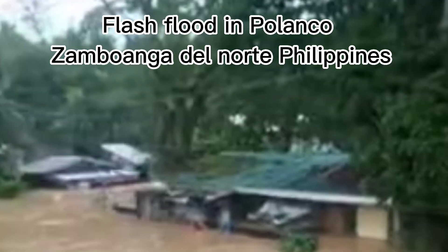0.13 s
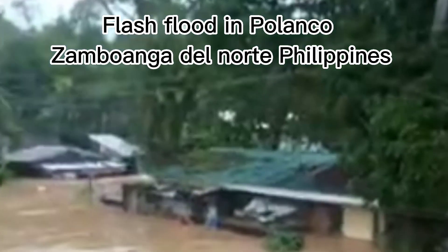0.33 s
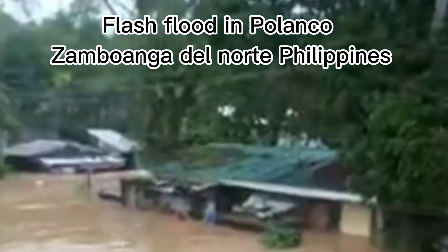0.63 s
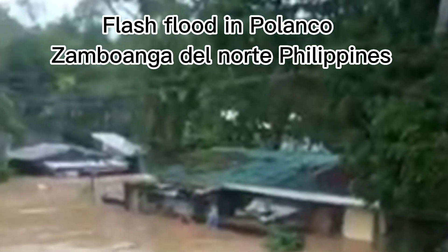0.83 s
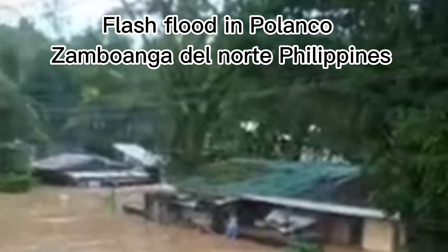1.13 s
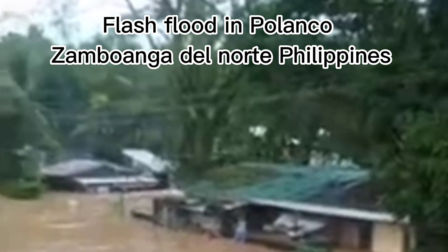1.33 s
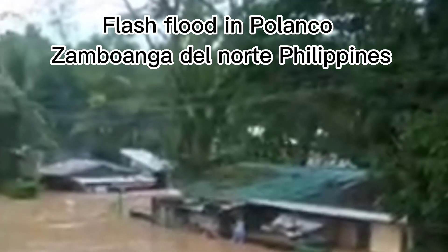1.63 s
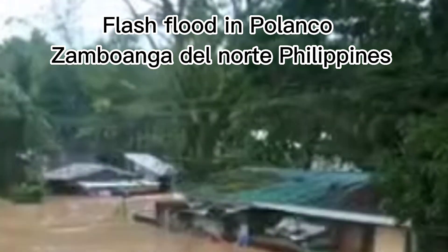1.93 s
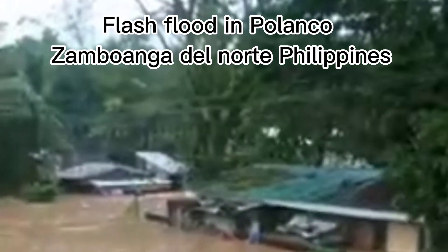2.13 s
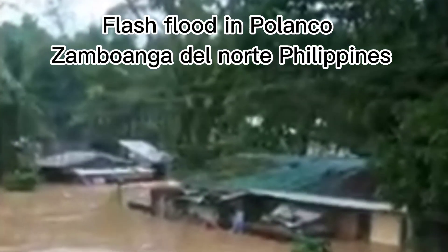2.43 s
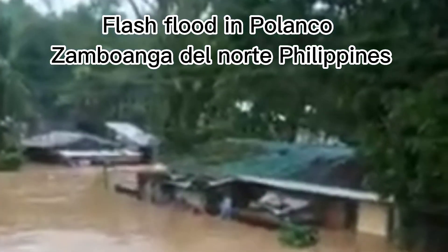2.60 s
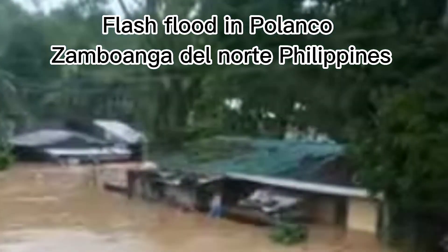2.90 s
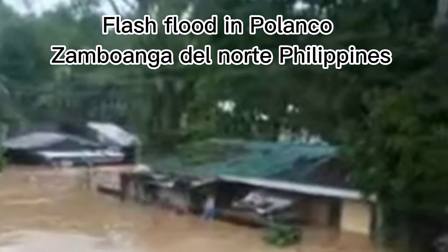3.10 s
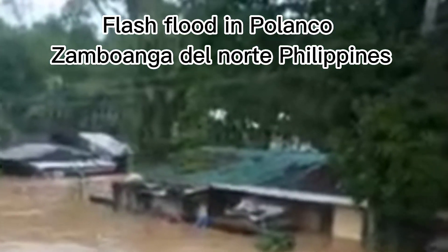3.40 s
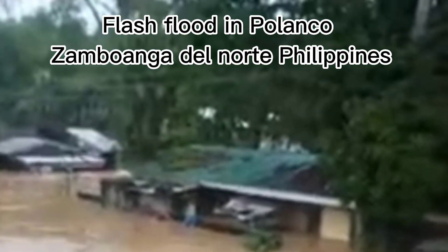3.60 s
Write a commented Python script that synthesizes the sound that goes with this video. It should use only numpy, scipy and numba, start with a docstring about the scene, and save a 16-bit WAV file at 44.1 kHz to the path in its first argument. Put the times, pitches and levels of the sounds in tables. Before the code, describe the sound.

Floodwater rushes and churns steadily close by, bubbling and splashing over a faint low motor hum.

```python
"""Flood water churns past houses, close to a phone under cover: distant wash, a froth of gliding sine
bubbles and ticks of noise for spray. Single plops, gurgles, climbing air pockets and droplet pings
stand out with a short echo. A small electric motor, a stack of sine partials, beats slowly against
the mains hum over a low outdoor rumble. The phone colours the rush strongly and adds faint hiss."""
import sys
import numpy as np
from scipy import signal
from scipy.fft import rfft, irfft
from scipy.io import wavfile
from scipy.ndimage import uniform_filter1d
from numba import njit

SR = 44100
rng = np.random.default_rng(int(sys.argv[2]) if len(sys.argv) > 2 else 0)


def wrap_up_sound(samples):
    """Save the sound to the file named by the first command line argument, as 16-bit audio."""
    columns = np.atleast_2d(samples).T
    # keep every value between -1 and 1, then stretch to whole-number steps
    tamed = np.clip(columns, -1, 1)
    steps = np.round(tamed * 32767).astype(np.int16)
    wavfile.write(sys.argv[1], SR, steps)


N = 165375

# Shared by small and large bubbles: share by which the pitch has risen once the decay length is reached
GLIDE = 0.086

# The surging flow. Each row: time in seconds, level below 4 kHz in dB, level above 4 kHz in dB.
FLOW_LEVELS = [(0, -20, -28.5), (.25, -24, -35.5), (.5, -23, -34), (.75, -22.5, -31.5), (.97, -21, -29.5),
               (1.13, -24.5, -32.5), (1.35, -22, -32.5), (1.58, -22, -29), (1.8, -23.5, -30),
               (2.1, -22.5, -32), (2.4, -23, -30.5), (2.7, -21.5, -31), (3, -22, -33), (3.2, -22, -31.5),
               (3.45, -23, -31), (3.75, -21.5, -30)]
SPLIT_HZ = 4000
BED_DB, FROTH_DB, SPRAY_DB = -2.5, -5.5, -11.5  # balance inside the rush, before colour and flow
SURGE_DB, SURGE_RATE_HZ = .7, 9.62


def rush():
    """Wash, froth and spray share one colour; low and high bands follow the flow, then surge together."""
    mix = level(wash(), BED_DB) + level(froth(), FROTH_DB) + level(spray(), SPRAY_DB)
    mix = water_colour(mix)
    low = signal.sosfiltfilt(signal.butter(4, SPLIT_HZ, fs=SR, output="sos"), mix)
    high = mix - low
    flow_s, low_db, high_db = np.array(FLOW_LEVELS).T
    now = np.arange(N) / SR
    low = level(low, 0) * undb(np.interp(now, flow_s, low_db))
    high = level(high, 0) * undb(np.interp(now, flow_s, high_db))
    return (low + high) * undb(SURGE_DB * walk(SURGE_RATE_HZ))


def wash():
    """Distant water blurs into noise whose level flickers."""
    flicker_db, flicker_rate_hz = 1.5, 40.15
    return rng.standard_normal(N) * undb(flicker_db * walk(flicker_rate_hz))


FROTH_PER_S, FROTH_SPREAD_DB = 1600, 3
FROTH_CYCLES, FROTH_ATTACK_CYCLES = 7.67, 4.8  # mean decay length, swell length


def froth():
    """Countless small bubbles ring at random moments, with pitches spread evenly in octaves."""
    place, pitch, size, length = rng.random((int(FROTH_PER_S * N / SR), 4)).T
    hz = 500 * 22 ** pitch  # 500 Hz to 11 kHz
    gain = hz * sizes(size, FROTH_SPREAD_DB)  # higher bubbles are louder
    cycles = FROTH_CYCLES * (.5 + length)
    return bubbles(N, place * N / SR, hz, cycles, gain, GLIDE + 0 * hz, FROTH_ATTACK_CYCLES)


SPRAY_PER_S, SPRAY_SPREAD_DB, SPRAY_HZ = 400, 4, 2960


def spray():
    """Landing spray makes tiny puffs of noise, thinned below a gentle high-pass."""
    place, size = rng.random((int(SPRAY_PER_S * N / SR), 2)).T
    puffs = splash(place * N / SR, sizes(size, SPRAY_SPREAD_DB))
    return signal.sosfilt(signal.butter(1, SPRAY_HZ, "high", fs=SR, output="sos"), puffs)


def drops():
    """Near water: single bubbles and droplets that stand out of the rush."""
    return plops() + gurgles() + pockets() + pings()


# Large bubbles. Each row: start in seconds, gain before the envelope in dB, starting pitch in Hz,
# decay length in cycles.
LARGE_BUBBLES = [(0.109, -0.5, 1380, 5.8), (0.3163, -4, 1730, 5.5), (0.3405, -15, 1640, 8),
                 (0.3648, -21, 1110, 6.1), (0.4264, -4, 1490, 6.7), (0.483, -16, 1700, 6.5),
                 (0.5042, -13, 1250, 7.4), (0.5945, -7.5, 1200, 6.4), (0.6374, -10, 1540, 7.2),
                 (0.6878, -13, 1540, 9.5), (0.7325, -14, 1620, 4.2), (0.7677, -12, 1140, 9.3),
                 (0.822, -8, 1150, 5.4), (0.8827, -12, 1270, 8), (0.9402, -14, 1140, 13),
                 (1.009, -18, 1140, 9.9), (1.035, 0.5, 1180, 4.3), (1.0587, 2.5, 1846, 8.2),
                 (1.1767, -10, 1640, 8.8), (1.2014, -3.5, 1680, 8), (1.2511, -5.5, 1720, 8.4),
                 (1.355, -19, 1255, 9.1), (1.485, -3, 1210, 9), (1.506, -10, 1630, 9.5),
                 (1.558, -12, 1690, 9), (1.6036, -8, 1160, 9.5), (1.6654, -15, 1840, 9.4),
                 (1.6995, -16, 1660, 8), (1.843, -6.5, 1620, 7.6), (1.8986, -6, 1370, 8),
                 (1.924, -3, 1114, 5.4), (1.9884, -8, 1570, 11), (2.0338, -15, 1630, 6.9),
                 (2.0464, -3, 1100, 5.9), (2.075, -3, 1670, 6.4), (2.1809, -18, 1340, 10),
                 (2.266, -12, 1620, 6.1), (2.3125, -15, 1070, 17), (2.3485, -6, 1080, 5.5),
                 (2.3979, -10.5, 1760, 17), (2.489, -13.5, 1104, 21), (2.6284, -9, 1170, 6.7),
                 (2.6754, -5, 1630, 8), (2.7275, -8.5, 1140, 6), (2.8789, -12, 1270, 6.6),
                 (2.9323, -10, 1660, 9.9), (2.989, -10.5, 1345, 12), (3.0596, -5, 1630, 5.4),
                 (3.1738, -5.5, 1660, 8.5), (3.26, -13, 1700, 8.7), (3.2802, -4.5, 1150, 6.7),
                 (3.406, -9, 1310, 5.8), (3.5242, -9, 1680, 8), (3.551, -3, 1460, 7),
                 (3.621, -11, 1300, 12), (3.69, -25, 1150, 6.6)]


def plops():
    """Large bubbles ring at a middle pitch and glide up slightly."""
    return ring(LARGE_BUBBLES, GLIDE)


# Deep gurgles. Each row: start in seconds, gain before the envelope in dB, starting pitch in Hz,
# decay length in cycles, rise of pitch by the decay length as a share.
DEEP_GURGLES = [(0.427, -17, 907, 16, 0.048), (0.603, -20.5, 590, 9, 0.083), (0.69, -21, 850, 11, 0.1),
                (0.801, -11.5, 724, 9.7, 0.091), (0.94, -14, 977, 15, 0.094), (1.037, -8, 780, 4.3, 0.068),
                (1.059, -7, 970, 8.5, 0.12), (1.355, -16, 824, 10, 0.1), (1.394, -27, 800, 12, 0.071),
                (1.52, -26, 760, 4.4, 0.12), (2.05, -15.5, 796, 8.8, 0.083), (2.485, -13.5, 890, 13, 0.082),
                (2.631, -10.5, 990, 7.7, 0.1), (2.688, -20, 810, 15, 0.1), (3.089, -11, 920, 6.6, 0.06),
                (3.121, -25, 666, 10, 0.094), (3.178, -14.5, 743, 12.4, 0.1), (3.23, -12, 840, 4.9, 0.051),
                (3.362, -20, 850, 16, 0.062), (3.513, -12, 784, 5.9, 0.1), (3.583, -28.5, 590, 15, 0.083),
                (3.682, -28, 980, 10, 0.12)]


def gurgles():
    """Deep bubbles climb in pitch as they ring, each by its own share."""
    return ring(DEEP_GURGLES, np.array(DEEP_GURGLES)[:, 4])


# Air pockets that fill with water. Each row: start in seconds, gain before envelope and flutter in dB,
# starting pitch in Hz, decay length in cycles, rise of pitch by the decay length as a share.
AIR_POCKETS = [(1.515, -21.5, 726, 85.3, 0.54), (2.492, -15.5, 1040, 38.6, 0.16),
               (3.176, -13, 1660, 27.8, 0.041)]
FLUTTER_DB, FLUTTER_RATE_HZ = 3, 150


def pockets():
    """The filling pocket gives a long climbing tone, with a fast random flutter in level."""
    return ring(AIR_POCKETS, np.array(AIR_POCKETS)[:, 4]) * undb(FLUTTER_DB * walk(FLUTTER_RATE_HZ))


# Droplet pings. Each row: start in seconds, gain before the envelope in dB, starting pitch in Hz,
# decay length in cycles, drive of the splash tick above the ping gain in dB.
DROPLET_PINGS = [(0.0172, -11, 7800, 11, 17.5), (0.107, -20, 5340, 17, 17), (0.3403, -20, 2500, 14, 22),
                 (0.6313, -21.5, 2630, 12, 18), (0.6867, -25, 2880, 13, 31), (0.6983, -22, 3010, 6.7, 33.5),
                 (0.7674, -17.5, 2560, 14, 27), (0.82, -20, 6700, 10, 31), (0.854, -3, 5350, 15.3, 9),
                 (0.8954, -30, 2870, 9.1, 13), (1.0585, -20, 2790, 8.7, 32), (1.1483, -19, 6300, 12, 29),
                 (1.1946, -11.5, 4800, 14, 23), (1.2717, -12, 8000, 15, 11), (1.395, -7, 6560, 14, 22),
                 (1.494, -14, 6200, 10, 20), (1.514, -12.5, 2560, 7.2, 21), (1.5569, -12, 6100, 16, 12),
                 (1.5931, -19.5, 2810, 22, 36), (1.676, -2, 3170, 4, 13), (1.7165, -19, 3130, 10, 12),
                 (1.806, -17.5, 2550, 15, 12), (1.8447, -13, 5230, 13, 22), (1.8921, -14.5, 2860, 17, 25.5),
                 (1.9739, -14, 5300, 13.5, 22.5), (2.0731, -20, 2590, 8, 31), (2.1362, -14, 6300, 16, 21),
                 (2.2215, -19, 2370, 16, 31.5), (2.2442, -15.5, 6000, 18, 15),
                 (2.2725, -18, 2770, 9.3, 28.5), (2.3114, -10.5, 2700, 7.2, 19),
                 (2.368, -18.5, 8530, 12, 26.5), (2.4038, -9.5, 7500, 10, 21),
                 (2.5401, -12.5, 6000, 8.6, 26), (2.583, -13, 6330, 21, 17), (2.6652, -14.5, 2580, 8.4, 17),
                 (2.7188, -21, 5600, 10, 25), (2.7502, -17, 5230, 14, 22), (2.7911, -22, 6500, 12, 19),
                 (2.8887, -7.5, 4420, 12.7, 20.5), (2.9846, -17, 2500, 11, 25), (3.0367, -18, 2950, 11, 22),
                 (3.0744, -23, 2790, 11, 19), (3.1351, -20, 2680, 14, 14), (3.1757, -8.5, 7440, 15, 22),
                 (3.2053, -14.5, 4400, 12, 18), (3.257, -19, 2450, 18, 23), (3.2856, -6.5, 5920, 8.4, 3),
                 (3.3057, -17.5, 6200, 15, 24), (3.3533, -22, 6600, 12, 22), (3.4151, -18, 6450, 15, 26.5),
                 (3.4765, -15.5, 2770, 12.5, 27), (3.5463, -14.5, 2380, 10, 26), (3.5738, 2.5, 6850, 4, 7),
                 (3.68, -21, 6200, 16, 15), (3.708, -15, 2500, 16, 12)]


def pings():
    """A droplet rings a small bubble and starts with a short splash tick."""
    start_s, gain_db, _, _, tick_db = np.array(DROPLET_PINGS).T
    ticks = splash(start_s, undb(gain_db + tick_db))
    ticks = np.diff(ticks, prepend=0)  # tilts the tick towards the treble
    return ring(DROPLET_PINGS, GLIDE) + water_colour(ticks)


# Colour of the water as the phone hears it. Each row: frequency in Hz, gain in dB.
WATER_COLOUR = [(400, -28), (520, -19.5), (600, -10), (800, -6), (1030, -8), (1170, 1), (1450, -5),
                (1700, -0.5), (2000, -6), (2300, -11.5), (3000, -13), (3400, -21.5), (3900, -24),
                (4100, -40.5), (4300, -24.5), (4600, -20), (4900, -22), (5150, -25.5), (5600, -17.5),
                (5900, -25), (6500, -16.5), (7200, -29), (7800, -24.5), (8500, -22), (8900, -26.5),
                (9200, -45), (9600, -38), (10500, -42.5), (11200, -53)]


def water_colour(x):
    """The phone's strong peaks and notches, laid over rush and splash ticks."""
    return colour(x, WATER_COLOUR)


def ring(table, rise):
    """Play the rows of a table as near bubbles, with a shared rise of pitch or one per row."""
    start_s, gain_db, hz, cycles = np.array(table, float)[:, :4].T.copy()
    attack_cycles = 5.23
    return bubbles(N, start_s, hz, np.maximum(cycles, 1), undb(gain_db), rise + 0 * start_s, attack_cycles)


@njit
def bubbles(size, start, hz, cycles, gain, glide, attack):
    """Each bubble is a sine that swells over a few cycles, rises in pitch and dies away."""
    out = np.zeros(size)
    for k in range(len(start)):
        step = hz[k] / SR
        phase = 0.  # in cycles
        for i in range(int(start[k] * SR), size):
            phase += step * (1 + glide[k] * phase / cycles[k])
            if phase > 3 * cycles[k]:
                break
            envelope = (1 - np.exp(-phase / attack)) * np.exp(-(phase / cycles[k]) ** 2)
            out[i] += gain[k] * envelope * np.sin(2 * np.pi * phase)
    return out


def splash(start_s, gain):
    """Puffs of noise whose envelope peaks after half a millisecond, then fades within a few more."""
    tick_s = .0005
    ticks, pole = np.zeros(N), np.exp(-1 / (tick_s * SR))
    ticks[(start_s * SR).astype(int)] = gain
    envelope = signal.lfilter([1], [1, -2 * pole, pole * pole], ticks)
    return np.e * (1 - pole) * envelope * rng.standard_normal(N)


def sizes(u, spread_db):
    """Gains from uniform draws: many small, few large, none above the cap."""
    loudest_db = 12
    return undb(np.minimum(-spread_db * np.log(1 - u), loudest_db))


def echo(near):
    """Nearby walls smear the drops into a short tail of decaying noise."""
    echo_db, t60_s, gap_s = -10, .05, .003
    t = np.arange(int(.1 * SR)) / SR
    tail = rng.standard_normal(len(t)) * undb(-60 * t / t60_s) * (t > gap_s)
    tail /= np.sqrt(np.sum(tail ** 2))
    return undb(echo_db) * signal.fftconvolve(near, tail)[:N]


# Motor partials. Each row: multiple of the shaft rate, level in dB rms before swell, dip or wobble.
MOTOR_PARTIALS = [(1, -47.5), (2, -47.5), (3, -54), (4, -61.5), (5, -51), (8, -56), (10, -45)]
SHAFT_HZ, IN_STEP_S = 59.06, .85  # all motor and hum sines cross zero together at this moment
SWELL_S, SWELL_TOP_S = 1.95, 1.36  # time between swells of the first partial, time of one crest
DIP_S, DIP_WIDTH_S, DIP_DEPTH = 2.05, .3, .7  # one dip of the second partial
WOBBLE_DB, WOBBLE_RATE_HZ = 3, 8.13  # random level of the higher partials


def motor():
    """Shaft partials: the first swells slowly, the second dips once, the higher ones wobble in level."""
    t = np.arange(N) / SR
    swell = np.tanh(2 * np.cos(np.pi * (t - SWELL_TOP_S) / SWELL_S))  # flips sign between crests
    dip = 1 - DIP_DEPTH * np.exp(-((t - DIP_S) / DIP_WIDTH_S) ** 2)
    out = np.zeros(N)
    for multiple, db in MOTOR_PARTIALS:
        multiple = round(multiple)
        shape = undb(WOBBLE_DB * walk(WOBBLE_RATE_HZ))
        if multiple == 1:
            shape = swell
        elif multiple == 2:
            shape = dip
        out += undb(db) * shape * np.sin(2 * np.pi * multiple * SHAFT_HZ * (t - IN_STEP_S))
    return np.sqrt(2) * out


def mains_hum():
    """Steady hum and its fifth harmonic, sign reversed, so the motor beats and cancels against it."""
    hum_hz, hum_db, fifth_db = 120., -46, -57.5  # levels in dB rms
    turn = 2 * np.pi * hum_hz * (np.arange(N) / SR - IN_STEP_S)
    return -np.sqrt(2) * (undb(hum_db) * np.sin(turn) + undb(fifth_db) * np.sin(5 * turn))


# Low outdoor rumble. Each row: frequency in Hz, gain in dB.
RUMBLE_COLOUR = [(20, -2), (35, -14), (48, -8), (90, -4), (200, -3), (290, 2), (430, -5.5), (700, -7)]


def outdoor_rumble():
    """Noise shaped to the low end of the outdoor background."""
    rumble_db = -44
    return level(colour(rng.standard_normal(N), RUMBLE_COLOUR), rumble_db)


def undb(db):
    """Turn decibels into an amplitude factor."""
    return 10 ** (np.asarray(db) / 20)


def level(x, db):
    """Set the rms level in dB."""
    return x * undb(db) / np.sqrt(np.mean(x ** 2))


def walk(rate):
    """Random levels held 1 / rate seconds and slewed twice; spread near 1."""
    hold = int(SR / rate)
    steps = np.repeat(rng.standard_normal(N // hold + 1), hold)
    return 1.22 * uniform_filter1d(uniform_filter1d(steps, hold), hold)[:N]


def colour(x, table):
    """Causal filter with the (Hz, dB) shape, from the cepstrum of the log gain."""
    hz, db = np.array(table, float).T
    f = np.maximum(np.arange(2049) * SR / 4096, 1)
    gain_db = np.interp(np.log(f), np.log(hz), db, right=-90)
    cepstrum = irfft(np.log(undb(gain_db)))
    cepstrum[1:2048] *= 2  # fold onto positive time: minimum phase
    cepstrum[2049:] = 0
    return signal.fftconvolve(x, irfft(np.exp(rfft(cepstrum))))[:N]


def scene():
    """Rush, near drops with their echo, motor, hum and rumble in one channel."""
    near = drops()
    walls = echo(near)
    rumble = outdoor_rumble()
    return (rush() + near + walls + motor() + mains_hum() + rumble)[None]


def record(dry):
    """The phone adds even hiss and cuts the top with a steep low-pass."""
    hiss_db, top_hz = -46.5, 15620  # hiss level before the cut
    wet = dry + level(rng.standard_normal(dry.shape), hiss_db)
    return signal.sosfilt(signal.ellip(16, .5, 60, top_hz, fs=SR, output="sos"), wet)


dry = scene()
out = record(dry)
wrap_up_sound(out)
```